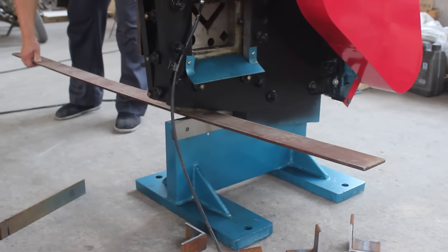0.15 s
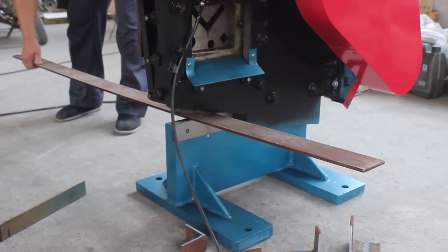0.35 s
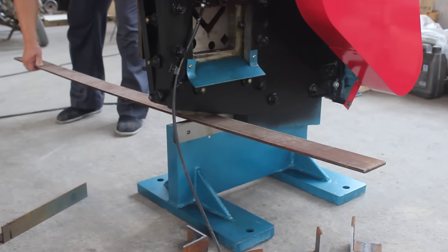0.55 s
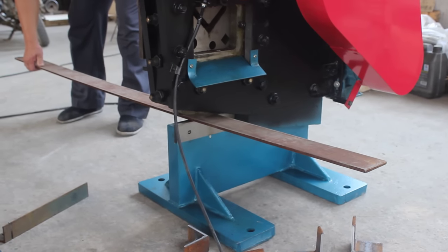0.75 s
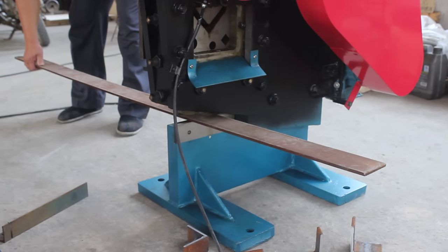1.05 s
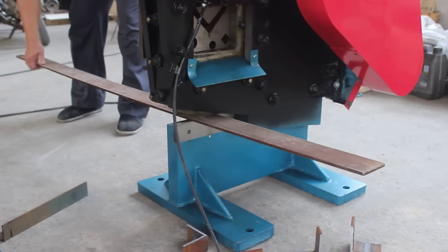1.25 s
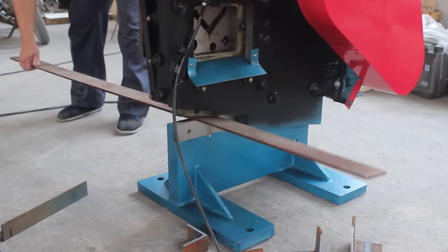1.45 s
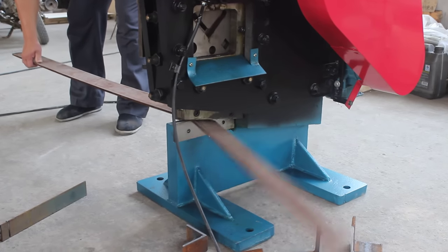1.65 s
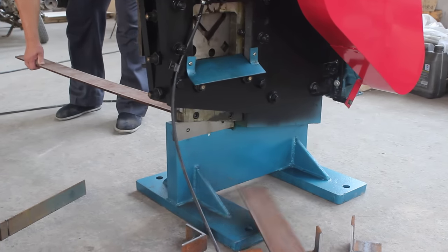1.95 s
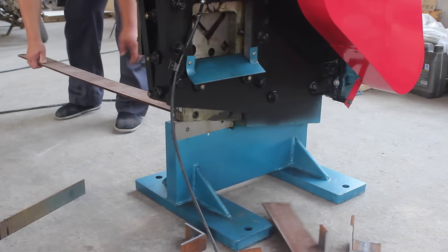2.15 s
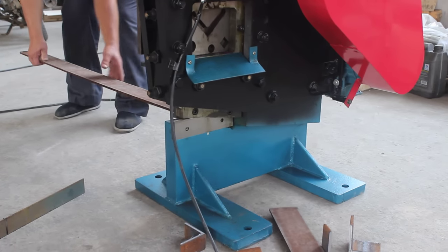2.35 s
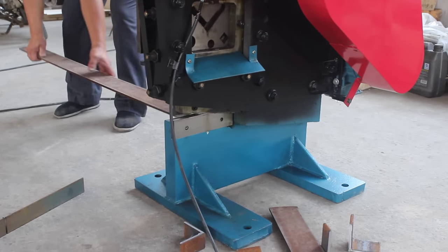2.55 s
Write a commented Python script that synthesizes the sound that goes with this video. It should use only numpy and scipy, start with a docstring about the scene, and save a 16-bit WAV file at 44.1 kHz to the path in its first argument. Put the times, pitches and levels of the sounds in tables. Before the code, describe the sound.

Steel snaps in a cutting machine, then the cut piece clangs and bounces over motor whirr.

```python
"""A flywheel shear crunches through a flat steel bar: the steel slips, cracks and snaps, ringing the frame.
The offcut clangs on the concrete, bounces and settles, each contact striking a fresh set of modes.
Light clinks of the long bar and a few dull thuds share the workshop hall's echo with it.
Underneath, the drive whirrs and a draught buffets the microphone.
The recorder's gain control ducks under the blows and slowly recovers."""
import sys
import numpy as np
from scipy import signal
from scipy.fft import rfft, irfft, next_fast_len
from scipy.io import wavfile
from scipy.ndimage import map_coordinates

SR = 44100
rng = np.random.default_rng(int(sys.argv[2]) if len(sys.argv) > 2 else 0)


def inscribe(sig):
    """Save sig as 16-bit PCM at rate SR to the path in sys.argv[1].

    A 1-D sig is mono; a 2-D sig holds one channel per row.
    Samples are clipped to [-1, 1] before scaling.
    """
    pcm = np.round(np.clip(np.atleast_2d(sig).T, -1, 1) * 32767)
    wavfile.write(sys.argv[1], SR, pcm.astype(np.int16))


N = 119511

# decay of the hall (frequency [Hz], t60 [s])
HALL_DECAY = [(200, 1.2), (2000, 4.2), (4500, 6.4), (8000, 3.8), (14000, 1.7)]
# swells of the draught (time [s], level [dB])
DRAUGHT_LEVEL = [(0, -32), (.08, -22.5), (.12, -19.5), (.18, -21.5), (.34, -12.5), (.42, -21), (.46, -16.5),
                 (.65, -20), (.72, -26), (.8, -30.5), (.89, -27), (.96, -14), (1.07, -18.5), (1.14, -25.5),
                 (1.22, -9), (1.3, -14.5), (1.38, -21.5), (1.52, -20.5), (1.7, -18.5), (1.85, -24.5),
                 (1.98, -10), (2.11, -20), (2.2, -12.5), (2.29, -34), (2.36, -16), (2.65, -13.5),
                 (2.71, -46)]
# colour of its rumble (frequency [Hz], level [dB])
DRAUGHT_SPECTRUM = [(20, -34.5), (45, -16), (90, -3), (170, -2), (280, -2), (450, -6.5), (700, -15),
                    (1200, -27), (2500, -37), (6000, -67)]
# single eddies thumping the microphone (time [s], level [dB])
EDDY_THUMPS = [(0.115, -7.5), (0.13, -8), (0.226, -11), (.29, -29), (0.338, -10), (0.356, -9.5),
               (0.37, -10), (0.402, -18.5), (0.451, -10), (0.465, -13), (0.553, -13.5), (.609, -7),
               (0.663, -7), (0.817, -17.5), (0.915, -14.5), (1.068, -10.5), (1.222, -9), (1.306, -8),
               (1.333, -21.5), (1.413, -13), (1.501, -11), (1.604, -13), (1.657, -10), (1.676, -13.5),
               (1.715, -24), (2.472, -10), (2.624, -6), (2.663, -4.5)]
# colour of a thump (frequency [Hz], level [dB])
EDDY_SPECTRUM = [(30, -16), (90, -3.5), (170, 6.5), (300, 0.5), (500, -7.5), (900, -12), (1400, -22),
                 (2500, -40), (6000, -68)]
FLUTTER_DB, FLUTTER_PER_S, THUMP_HALF_WIDTH_S = 4, 65, 0.0039

# swells of the drive's whirr (time [s], level [dB])
WHIRR_LEVEL = [(0, -28), (.1, -23.5), (.18, -30), (.29, -24.5), (.42, -31.5), (.48, -29.5), (.6, -26.5),
               (.71, -32), (.85, -27), (1.04, -20.5), (1.12, -23.5), (1.21, -22), (1.35, -33.5),
               (1.48, -29), (1.7, -26.5), (2, -18.5), (2.4, -27), (2.71, -17.5)]
# colour of the whirr (frequency [Hz], level [dB])
WHIRR_SPECTRUM = [(30, 3.5), (150, 10), (500, -7), (1000, -1.5), (1550, 5), (2000, -1.5), (2600, -3.5),
                  (3100, -8.5), (4000, -6.5), (5300, -12.5), (5900, -12.5), (6300, -6), (6800, -16.5),
                  (7600, -26), (10000, -35.5), (11100, -37), (11500, -29), (11900, -39.5), (15500, -46.5)]
# motor and gear tones (frequency [Hz], level [dB])
HUM_TONES = [(161, -34), (474, -39), (1556, -49), (3526, -47.5), (3698, -48.5), (3967, -51)]
WHIRR_FLICKER_DB, HUM_WANDER_HZ = .9, 3.76

# dull blows (time [s], level [dB])
THUD_HITS = [(0.405, -24), (.607, -31), (0.659, -43), (1.797, -14), (1.912, -1)]
# colour of a thud (frequency [Hz], level [dB])
THUD_SPECTRUM = [(50, -13), (200, -29.5), (450, -3), (750, 4.5), (1200, 0.5), (2200, -5), (5000, -56),
                 (12000, -73)]
# knocks on the long bar (time [s], ring level [dB], tick level [dB])
BAR_KNOCKS = [(.471, -17, -15.5), (1.066, -33, -11.5), (1.7205, -32, -18.5)]
# modes of the long bar (frequency [Hz], level [dB], t60 [s])
BAR_MODES = [(1158, 2.5, 0.1), (1280, -6, 0.22), (2634, 3.5, 0.035), (3000, -33, 0.068)]
# colour of a knock's tick (frequency [Hz], level [dB])
TICK_SPECTRUM = [(100, -16.5), (800, 12.5), (1300, 5), (2800, 2.5), (5000, -10), (8500, -21.5),
                 (11000, -31), (15500, -34)]
HIT_ATTACK_S, THUD_T60_S, TICK_T60_S = 0.0016, 0.14, 0.056

# modes of the offcut (frequency [Hz], level [dB], t60 [s], group [index])
# groups: 1-3 the three strongest modes, 4 bending, 5 twisting, 0 the rest
OFFCUT_MODES = [(770, -24.5, .6, 4), (1005, -20, .45, 5), (1141, -20, .35, 4), (1275, -15, .8, 4),
                (1754, -20, .7, 5), (1900, 0, 1, 1), (2406, -11, .6, 4), (2650, 0, .7, 2),
                (3124, -11.5, .55, 4), (3521, -1, .4, 3), (3900, -8, .45, 0), (4506, -13, .4, 5),
                (4760, -10, .4, 0), (5585, -17, .27, 0), (5712, -11, .27, 0), (6492, -29, .25, 0),
                (6718, -23, .22, 5), (6869, -22, .25, 0), (7337, -29, .38, 0), (7845, -24, .25, 5),
                (8198, -30, .3, 0), (8645, -29, .26, 4), (9033, -34, .26, 0), (9490, -43, .25, 0),
                (10481, -40, .33, 0), (11046, -42, .22, 5), (11767, -45, .3, 0), (12726, -46, .3, 0),
                (13845, -47, .3, 5)]
# blows on the offcut (time [s], ring level [dB], five boosts for groups 1-5 [dB],
# treble tilt [dB/octave], early fall [dB], grit level [dB])
OFFCUT_HITS = [(1.782, 2.5, -29, -17, -18, -18, -2, -3, 3.3, -33),
               (1.7963, 4.5, -3.5, -5, 1.5, 4.5, -3, 4, 5.6, -29),
               (1.9041, -4, 6, 0, 1, -4, 12.5, -3.5, 6.3, -11),
               (2.0431, -5.5, 8, 9.5, 4, -7, 9, -27, 2.5, -19),
               (2.071, 1.5, 4.5, 4.5, 2.5, -1.5, 0.5, -2.5, 3, -2),
               (2.1047, 1, 2, 3, -6.5, -6.5, -4.5, -11.5, 2, -15),
               (2.1775, -2, -17, -2, 5, -8, 6, -12, 5.9, -10.5),
               (2.187, -6.5, -10, 2.5, 8.5, 5, -3, 5, 2.2, -14),
               (2.2098, -2, 0, 4, 2.5, -7.5, -5, 2.5, 2.8, -7.5),
               (2.2556, -3, -1.5, 7.5, 5, -7, 1.5, -3, 8, -16),
               (2.288, -13.5, 3.5, -27, -26, -1, 3.5, -1, 4.1, -9)]
# colour of the grit in a floor contact (frequency [Hz], level [dB])
CONCRETE_SPECTRUM = [(60, -21), (250, -19), (900, -12), (2000, 1), (3500, 2.5), (5500, -22), (8000, -26),
                     (11000, -34.5), (15500, -46)]
MODE_SCATTER_DB, CONTACT_DAMP_S = 2, 0.0022
EARLY_FALL_DB_PER_OCTAVE, EARLY_FALL_S = 4, 0.027
GRIT_CHATTER_DB, GRIT_CHATTER_PER_S, GRIT_T60_S = 11, 380, 0.086
SWAY_DB, DOPPLER_SHARE, TUMBLE_PER_S = 2, .0013, 22

# the bar slips under the blade and snaps (time [s], ring level [dB], crack level [dB])
BLADE_SLIPS = [(1.738, -17.5, -26), (1.7478, -18, -35), (1.754, -8, -25), (1.763, -4.5, -21),
               (1.767, -7.5, -25), (1.77, -3, -15), (1.7815, -19, -7), (1.7873, -20, -1),
               (1.7967, 0.5, -9.5)]
# modes of blade and frame, plus a 3.9 kHz tone of the piece being cut off (frequency [Hz], level [dB], t60 [s])
FRAME_MODES = [(1405, -19.5, 0.1), (1764, -12, 0.058), (2120, -8.5, 0.057), (2428, -3, 0.059),
               (2593, -3, .07), (2856, -1, 0.043), (3188, -9, 0.074), (3920, -6.5, 0.056), (5600, -22, .05),
               (5400, -21, 0.04)]
# colour of the cracking steel (frequency [Hz], level [dB])
CRACK_SPECTRUM = [(60, -30), (250, -29), (600, -15), (1300, 5.5), (2500, 1), (4000, 10), (5700, -2.5),
                  (8000, -8), (10500, -33), (15500, -37)]
SLIP_ATTACK_S, CRACK_T60_S = 0.00071, 0.11

THRESHOLD_DB, RELEASE_DB_PER_S, DETECTOR_S = -11, 10.5, 0.0046
DETECTOR_LOW_CUT_HZ, TOP_HZ = 700, 15800
TIME = np.arange(N) / SR


def amp(db):
    """Decibels to gain."""
    return 10 ** (np.asarray(db) / 20)


def unit_rms(x):
    """The signal scaled to rms 1."""
    return x / np.sqrt(np.mean(x ** 2) + 1e-20)


def at_frequency(points, hz):
    """(frequency [Hz], value) points read on a log axis."""
    knots_hz, values = np.transpose(points)
    return np.interp(np.log(hz + 1), np.log(knots_hz + 1), values)


def fader(points):
    """(time [s], level [dB]) points as a dB value for every sample."""
    return np.interp(TIME, *np.transpose(points))


def wobble(per_s, t=TIME, knots=1024):
    """A smooth random curve passing per_s knots a second."""
    return map_coordinates(rng.standard_normal(knots), [t * per_s], mode="wrap")


def filtered(x, response):
    """The signal shaped by a gain for each frequency."""
    size = next_fast_len(N + SR // 2)
    return irfft(rfft(x, size) * response(np.fft.rfftfreq(size, 1 / SR)), size)[:N]


def noise(spectrum):
    """Coloured noise of rms 1."""
    return unit_rms(filtered(rng.standard_normal(N), lambda hz: amp(at_frequency(spectrum, hz))))


def burst(spectrum, t60, t):
    """Coloured noise that dies away."""
    return noise(spectrum)[:len(t)] * amp(-60 * t / t60)


def ring(modes, level_db, t):
    """Struck steel: decaying sine modes at random phases."""
    hz, db, t60 = np.transpose(modes)[:, :, None]
    phase = rng.uniform(0, 2 * np.pi, hz.shape)
    return (amp(db + level_db - 60 * t / t60) * np.sin(2 * np.pi * hz * t + phase)).sum(0)


def hall(x):
    """The workshop's echo: a noise tail that hangs longest in the upper mids."""
    hz, t, bands = signal.stft(rng.standard_normal(SR), SR, nperseg=256)
    decay = amp(-60 * t / at_frequency(HALL_DECAY, hz)[:, None])
    tail = signal.istft(bands * decay, SR, nperseg=256)[1]
    return signal.fftconvolve(x, tail / np.linalg.norm(tail))[:N]


def draught():
    """Turbulent air on the microphone: a fluttering rumble, with single eddies landing as thumps."""
    rumble = noise(DRAUGHT_SPECTRUM) * amp(FLUTTER_DB * wobble(FLUTTER_PER_S))
    air = unit_rms(rumble) * amp(fader(DRAUGHT_LEVEL))
    eddies = noise(EDDY_SPECTRUM)
    for start, db in EDDY_THUMPS:
        swell = np.exp(-.5 * ((TIME - start) / THUMP_HALF_WIDTH_S) ** 2)
        thump = swell * eddies
        air += amp(db) * thump * np.linalg.norm(swell) / np.linalg.norm(thump)
    return air


def drive():
    """The drive whirrs unevenly over slightly unsteady motor and gear tones."""
    out = noise(WHIRR_SPECTRUM) * amp(fader(WHIRR_LEVEL) + WHIRR_FLICKER_DB * wobble(per_s=35.14))
    for hz, db in HUM_TONES:
        pitch_hz = hz + HUM_WANDER_HZ * wobble(per_s=14)
        out += amp(db) * unit_rms(np.sin(2 * np.pi * np.cumsum(pitch_hz) / SR))
    return out


def thuds():
    """Short dull blows with no ring."""
    out, t = np.zeros(N), np.arange(SR // 4) / SR
    attack = 1 - np.exp(-t / HIT_ATTACK_S)
    for start, db in THUD_HITS:
        mix_in(out, start, amp(db) * attack * burst(THUD_SPECTRUM, THUD_T60_S, t))
    return out


def mix_in(out, start, sound):
    """Lays a hit into the track at start [s]."""
    part = out[round(start * SR):][:len(sound)]
    part += sound[:len(part)]


def long_bar():
    """The bar clinks as it is lined up and as the blade first touches it."""
    out, t = np.zeros(N), np.arange(SR // 4) / SR
    attack = 1 - np.exp(-t / HIT_ATTACK_S)
    for start, ring_db, tick_db in BAR_KNOCKS:
        clink = ring(BAR_MODES, ring_db, t)
        tick = amp(tick_db) * burst(TICK_SPECTRUM, TICK_T60_S, t)
        mix_in(out, start, attack * (clink + tick))
    return out


def tumbling_ring(hz, db, t60, t):
    """Decaying modes of a tumbling piece: each sways in level and pitch."""
    out = np.zeros(len(t))
    for mode_hz, mode_db, mode_t60 in zip(hz, db, t60):
        sway_db = SWAY_DB * wobble(TUMBLE_PER_S, t, knots=64)
        pitch_hz = mode_hz * (1 + DOPPLER_SHARE * wobble(TUMBLE_PER_S, t, knots=64))
        phase = 2 * np.pi * (rng.random() + np.cumsum(pitch_hz) / SR)
        out += amp(mode_db + sway_db - 60 * t / mode_t60) * np.sin(phase)
    return out


def offcut():
    """Every contact chokes the old ring and starts a new one, coloured by where the piece is struck."""
    out, t = np.zeros(N), np.arange(SR // 2) / SR
    hz, db, t60, group = np.transpose(OFFCUT_MODES)
    octaves = np.log2(hz / 3500)  # tilt and early fall pivot on 3500 Hz
    ends = [hit[0] for hit in OFFCUT_HITS[1:]] + [N / SR]
    attack = 1 - np.exp(-t / HIT_ATTACK_S)
    settling = 1 - np.exp(-(t / EARLY_FALL_S) ** 2)
    for (start, ring_db, *group_db, tilt, fall_db, grit_db), end in zip(OFFCUT_HITS, ends):
        boost_db = np.r_[0, group_db][group.astype(int)] + MODE_SCATTER_DB * rng.standard_normal(len(hz))
        struck_db = db + ring_db + boost_db + tilt * np.maximum(octaves, 0)
        # the high modes drop furthest just after the hit
        drop_db = np.outer(np.maximum(fall_db + EARLY_FALL_DB_PER_OCTAVE * octaves, 0), settling)
        choke = np.exp(-np.maximum(start + t - end, 0) / CONTACT_DAMP_S)
        clang = choke * tumbling_ring(hz, struck_db[:, None] - drop_db, t60, t)
        chatter_db = GRIT_CHATTER_DB * np.tanh(wobble(GRIT_CHATTER_PER_S, t))
        grit = amp(grit_db + chatter_db) * burst(CONCRETE_SPECTRUM, GRIT_T60_S, t)
        mix_in(out, start, attack * (clang + grit))
    return out


def shear_blade():
    """The crunch of the cut: each slip of the steel cracks and briefly rings blade, frame and the piece being
    cut off."""
    out, t = np.zeros(N), np.arange(SR // 4) / SR
    attack = 1 - np.exp(-(t / SLIP_ATTACK_S) ** 2)
    for start, ring_db, crack_db in BLADE_SLIPS:
        frame = ring(FRAME_MODES, ring_db, t)
        crack = amp(crack_db) * burst(CRACK_SPECTRUM, CRACK_T60_S, t)
        mix_in(out, start, attack * (frame + crack))
    return out


def scene():
    """The hits and their hall echo over a dry bed of drive and draught, in mono."""
    hits = long_bar() + shear_blade() + offcut() + thuds()
    return (hits + amp(db=-13) * hall(hits) + drive() + draught())[None]


def record(dry):
    """Gain control, deaf to the bass, ducks fast and recovers slowly; then clipping and a top cut."""
    mono, smoothing = dry[0], np.exp(-1 / (DETECTOR_S * SR))
    sidechain = signal.sosfilt(signal.butter(2, DETECTOR_LOW_CUT_HZ, "high", fs=SR, output="sos"), mono)
    power = signal.lfilter([1 - smoothing], [1, -smoothing], sidechain ** 2)
    over_db = np.maximum(10 * np.log10(power + 1e-12) - THRESHOLD_DB, 0)
    recovery_db = RELEASE_DB_PER_S * TIME
    duck_db = np.maximum.accumulate(over_db + recovery_db) - recovery_db
    clipped = np.clip(mono * amp(-duck_db), -1, 1)
    return filtered(clipped, lambda hz: hz < TOP_HZ)[None]


dry = scene()
out = record(dry)
inscribe(out)
```